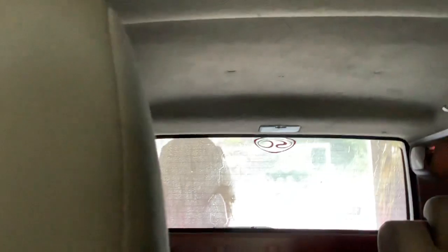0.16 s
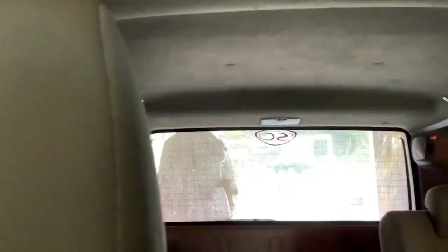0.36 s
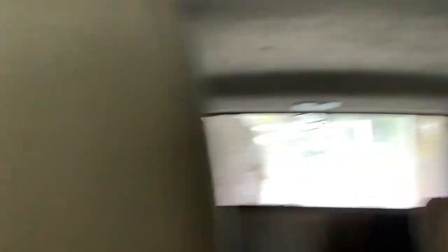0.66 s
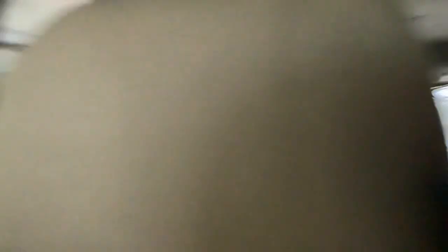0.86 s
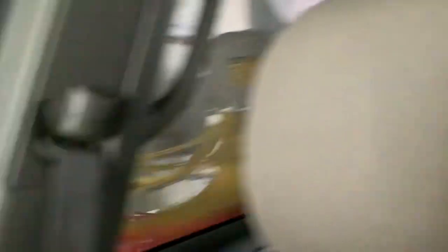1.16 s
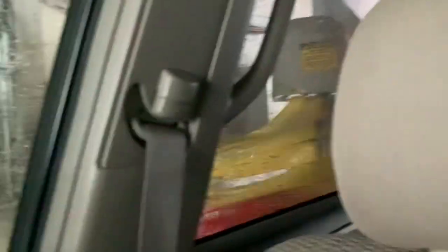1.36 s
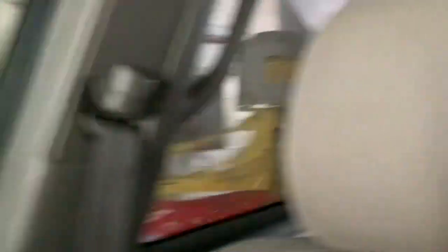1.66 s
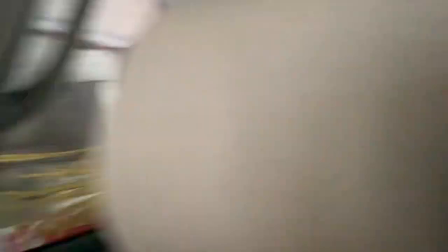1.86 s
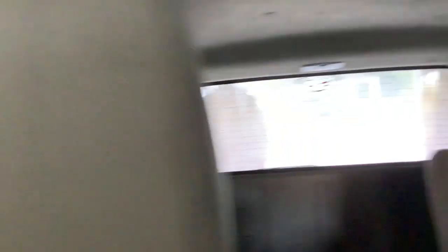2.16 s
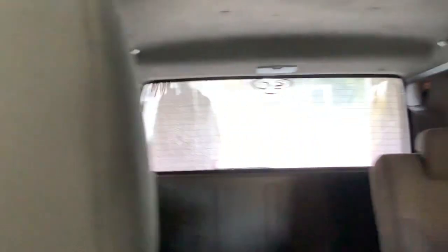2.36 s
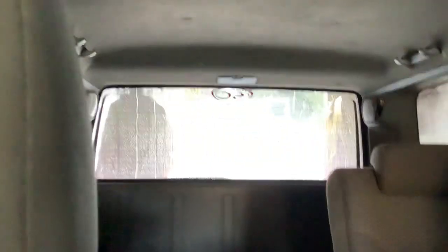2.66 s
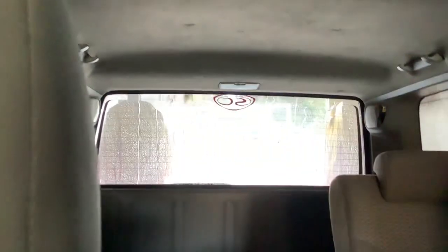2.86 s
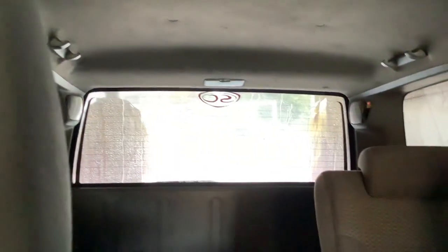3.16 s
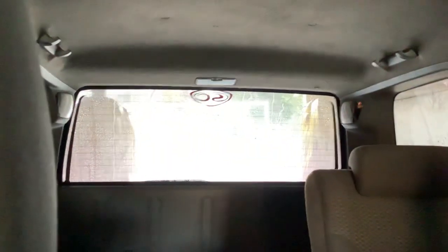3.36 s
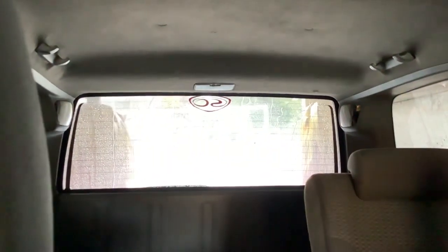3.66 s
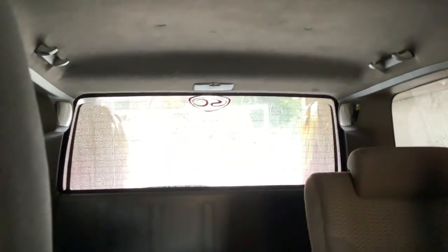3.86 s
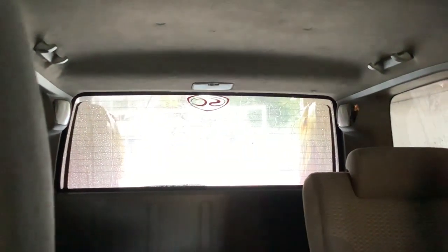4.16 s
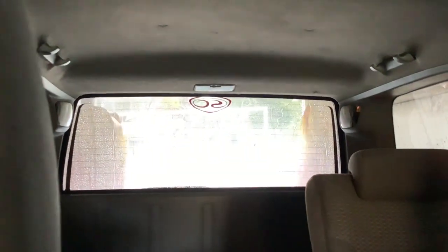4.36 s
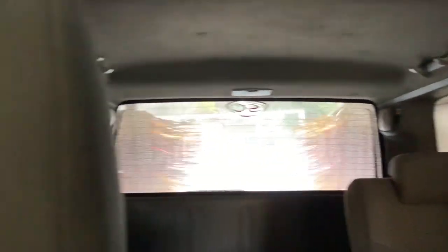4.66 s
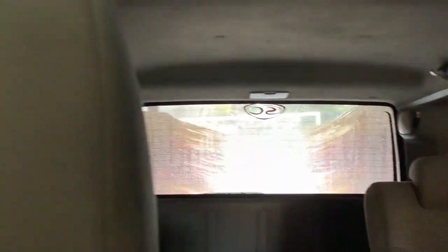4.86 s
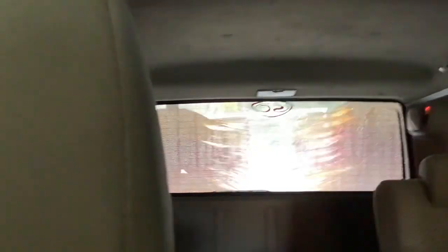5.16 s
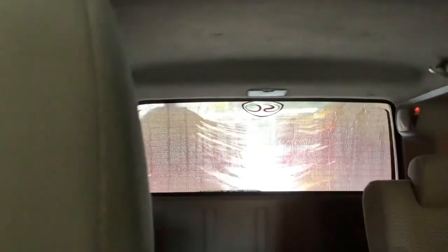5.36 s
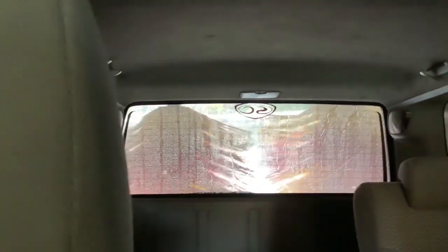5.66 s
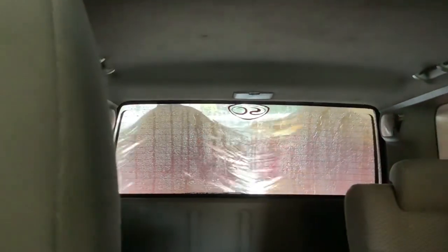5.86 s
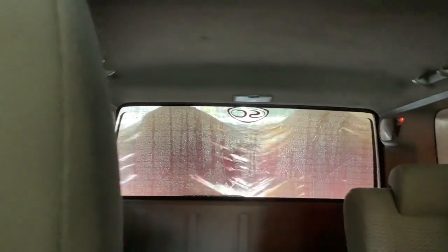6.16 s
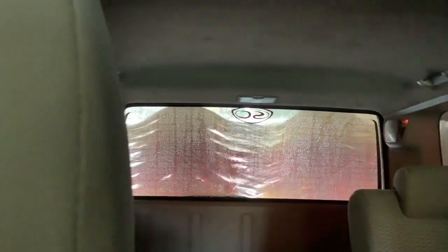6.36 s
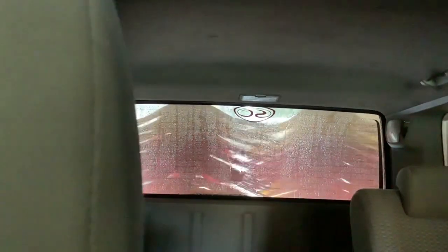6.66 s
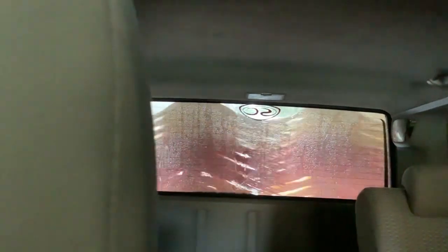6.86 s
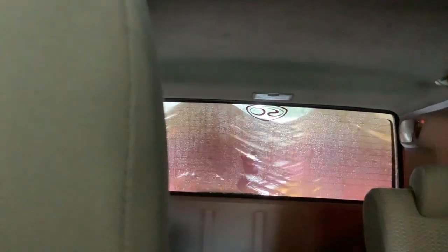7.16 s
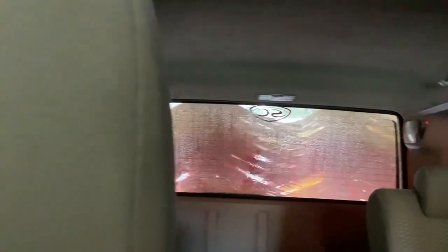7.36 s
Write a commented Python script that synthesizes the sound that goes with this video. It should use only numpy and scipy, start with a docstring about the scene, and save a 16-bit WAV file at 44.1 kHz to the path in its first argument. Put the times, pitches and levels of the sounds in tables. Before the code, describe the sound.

Wet cloth brushes scrub and spatter loudly along a car's side, heard from the cabin, then recede to faint muffled thumps behind the rear window.

```python
"""Wet cloth brushes scrub and spray along the side of a car in a wash bay, close to a microphone in the cabin;
then they move off and close in behind the tailgate. Scrub and spray are coloured contacts and noise.
Cloth patter and single blows ring cabin and panel modes; strips slap the glass as shaped noise bursts.
Short rubs, a dragged rear window, a wandering band of rushing water and a steady hiss lie underneath."""
import sys
import numpy as np
from scipy import signal
from scipy.fft import rfft, irfft, next_fast_len
from scipy.io import wavfile
from scipy.ndimage import uniform_filter1d

SR = 44100
rng = np.random.default_rng(int(sys.argv[2]) if len(sys.argv) > 2 else 0)


def materialize(psi):
    """Save the field psi as 16-bit PCM at rate SR to the path in sys.argv[1].

    A 1-D psi becomes a single channel; in a 2-D psi each row is a channel.
    """
    bounded = np.clip(np.atleast_2d(psi).T, -1, 1)
    quanta = np.round(bounded * 32767).astype(np.int16)
    wavfile.write(sys.argv[1], SR, quanta)


N = 330750


def gain_of(db):
    """Decibels to an amplitude factor."""
    return 10 ** (np.asarray(db) / 20)


def evened(x):
    """Scales to rms 1."""
    return x / np.sqrt(np.mean(x ** 2) + 1e-20)


def add(mix, start_s, sound):
    """Mixes a sound in at a time, cut at the end of the mix."""
    part = mix[round(start_s * SR):][:len(sound)]
    part += sound[:len(part)]


def control(curve, column):
    """One dB column of a curve as a gain for every sample."""
    rows = np.array(curve)
    return gain_of(np.interp(np.arange(N) / SR, rows[:, 0], rows[:, column]))


def flutter(per_s):
    """Slow noise of rms 1 that changes about per_s times a second."""
    f = np.fft.rfftfreq(N, 1 / SR) / per_s
    shape = f / (0.22 + f ** 2) / (1 + f ** 2)
    return evened(irfft(rfft(rng.standard_normal(N)) * shape, N))


def coloured(x, spectrum):
    """Filters x by a spectrum drawn on a log-frequency axis; rms 1."""
    hz, db = np.transpose(spectrum)
    f = np.fft.rfftfreq(len(x), 1 / SR)
    colour_db = np.interp(np.log(f + 1), np.log(hz), db, -90, -90)
    return evened(irfft(rfft(x) * gain_of(colour_db), len(x)))


def patter(per_s, spread_db):
    """Many small contacts at random moments and of random sign, a few of them large."""
    size = gain_of(spread_db * np.minimum(rng.exponential(1, N), 5))
    sign = np.sign(rng.standard_normal(N))
    return size * sign * (rng.random(N) < per_s / SR)


def patchy(x, depth_db):
    """Lets patches of the spectrum swell and fade at random; rms 1."""
    z = signal.stft(x, nperseg=1024, noverlap=768)[2]
    patches = uniform_filter1d(rng.standard_normal(z.shape), size=3, axis=0)
    patches = uniform_filter1d(patches, size=10, axis=1)
    z = z * gain_of(depth_db * evened(patches))
    return evened(signal.istft(z, nperseg=1024, noverlap=768)[1][:N])


def ring(hz, width_hz):
    """Answer of a resonance with steep skirts to one tap; energy 1."""
    t = np.arange(SR // 4) / SR
    wave = t * np.exp(-np.pi * 1.5 * width_hz * t) * np.sin(2 * np.pi * hz * t)
    return wave / np.linalg.norm(wave)


def already_sounding(hits, response):
    """Convolves hits with a quarter-second response that is already sounding at the start."""
    lead = SR // 4
    led_in = np.tile(hits, 2)[N - lead:]
    return signal.oaconvolve(led_in, response)[lead:][:N]


# brush work at the microphone: time_s, scrub_db, spray_db, cabin_air_db, roof_and_doors_db, small_panels_db
BRUSH = [(0, -24.5, -36.5, -32, -24.5, -27), (.3, -24, -36, -39, -27.5, -28),
         (.58, -26, -35.5, -38, -30.5, -26.5), (.9, -28.5, -38.5, -39, -27.5, -30),
         (1.42, -25.5, -35, -35, -33.5, -27.5), (1.55, -30, -40, -36, -32, -33),
         (1.9, -26.5, -36, -35.5, -33, -28), (2.15, -25, -38, -39, -26.5, -31),
         (2.35, -25.5, -38.5, -42, -30, -29.5), (2.55, -27, -39, -40, -30.5, -28),
         (2.8, -26.5, -40.5, -35, -30.5, -32), (2.86, -31, -43, -47, -31.5, -31),
         (2.95, -31, -45, -50, -33, -29), (3.05, -36.5, -48, -44, -41, -35.5),
         (3.18, -36.5, -47, -50, -40, -37), (3.3, -38, -54, -47, -35, -37.5),
         (3.47, -49, -56.5, -49, -51, -45.5), (3.58, -45, -56.5, -48, -42, -34.5),
         (3.72, -45.5, -56, -53, -33.5, -41.5), (3.9, -44, -56.5, -47, -40, -36.5),
         (4.1, -43.5, -56.5, -49, -39.5, -37.5), (4.35, -46, -62, -44, -43, -41.5),
         (4.55, -51, -66, -53, -47.5, -45.5), (4.85, -50, -62, -54, -45, -44),
         (5.15, -50, -61.5, -53, -43, -47), (5.7, -50.5, -66.5, -57, -48.5, -44),
         (6.1, -49.5, -66.5, -55, -44, -45), (6.5, -50.5, -66.5, -51, -49, -46),
         (6.75, -48.5, -63.5, -66, -41, -44), (7.0, -51.5, -61.5, -55, -43, -45),
         (7.5, -48.5, -54.5, -51, -44, -46.5)]
# nearness of the cloth contact: time_s, near_share (0-1)
NEAR = [(0, 1), (.5, 0.66), (1.2, 0.98), (2.6, 0.65), (3.1, 0.98), (3.3, 0.47), (3.5, 0.67), (4.0, 0.38),
        (4.6, 0.24), (5.8, 0.22), (6.6, 0.32), (7.0, 0.54), (7.5, 0.67)]
# cloth on paint, beside the microphone and from behind the car: freq_hz, relative_db (per Hz)
SCRUB_NEAR = [(220, -22), (340, 0), (480, 2), (540, -4.5), (640, -1), (700, -3), (765, 0.5), (830, -5.5),
              (1000, -4.5), (1100, -3.5), (1250, -5), (1370, -10), (1500, -6.5), (1630, -9), (1730, -9),
              (1800, -11), (2400, -18.5), (4000, -32.5)]
SCRUB_FAR = [(220, -42), (350, 5.5), (480, -2.5), (570, -2), (640, -4.5), (690, -11), (745, -9),
             (920, -13.5), (1050, -14), (1210, -20), (1300, -16.5), (1700, -27), (2150, -23), (2600, -34),
             (4000, -40)]
# water spray, near and far: freq_hz, relative_db (per Hz)
SPRAY_NEAR = [(1200, -19), (2200, 0.5), (3500, -3), (5500, -4), (8000, -7), (12000, -9.5), (16000, -13)]
SPRAY_FAR = [(1500, -24), (2600, -5), (3300, -1.5), (4400, 0), (6000, -8), (8000, -3), (12000, -14.5),
             (16000, -9)]
# spray smooths out as it moves off: from_s, to_s
SPRAY_LEAVES_S = [1.1, 3.1]
DROPS_DB = -6  # re spray, before it smooths out
PRESS_SCRUB, PRESS_SPRAY = 0.16, 0.091  # amplitude share added by a landing strip
LULL_SPRAY = 1  # share of the lull depth in dB


def scrub_and_spray():
    """Cloth drags over paint and throws water; both swell as bunches of strips pass, less so from afar."""
    t = np.arange(N) / SR
    near = np.interp(t, *np.transpose(NEAR))
    far = 1 - near
    uneven = 0.84 + 0.29 * near
    bunches = uneven * flutter(27.0)

    contacts = patter(per_s=6000, spread_db=1.5)
    scrub_far = evened(coloured(contacts, SCRUB_FAR) * flapping())
    scrub = patchy(near * coloured(contacts, SCRUB_NEAR) + far * scrub_far, depth_db=1.8)
    scrub *= gain_of(0.55 * near * bunches + 1.3 * far * flutter(12.0))

    water = rng.standard_normal(N)
    spray = near * coloured(water, SPRAY_NEAR) + far * coloured(water, SPRAY_FAR)
    spray = patchy(spray, depth_db=2.0)
    roughness = 0.5 + 0.5 * np.interp(t, SPRAY_LEAVES_S, [1, 0])
    spray *= gain_of(roughness * (2.0 * bunches + 0.87 * uneven * flutter(52.0)))
    spray = evened(spray) + gain_of(DROPS_DB) * roughness * droplets()

    pressed, dip_db = pressing(), lulls_db()
    scrub = evened(scrub) * (1 + PRESS_SCRUB * pressed) * gain_of(dip_db)
    spray = evened(spray) * (1 + PRESS_SPRAY * pressed) * gain_of(LULL_SPRAY * dip_db)
    return control(BRUSH, column=1) * scrub + control(BRUSH, column=2) * spray


FLAPS_PER_S, FLAP_RISE_S, FLAP_T60_S, FLAP_SHARE = 60, 0.014, 0.18, 0.1


def flapping():
    """Loose strips flap on the tailgate: uneven pushes at random moments, each dying away."""
    t = np.arange(SR // 4) / SR
    push = np.minimum(t / FLAP_RISE_S, 1) * gain_of(-60 * t / FLAP_T60_S)
    hits = abs(patter(per_s=FLAPS_PER_S, spread_db=4.5))
    return 1 + FLAP_SHARE * evened(already_sounding(hits, push))


DROPS_PER_S, DROP_RISE_S, DROP_T60_S = 400, 0.00051, 0.027


def droplets():
    """Single splashes of 16 colours scattered at random: band noise with a fast rise and decay."""
    out, t = np.zeros(N), np.arange(1024) / SR
    octave = np.log2(np.fft.rfftfreq(len(t), 1 / SR) / 1000 + .01)  # re 1 kHz
    shape = np.minimum(t / DROP_RISE_S, 1) * gain_of(-60 * t / DROP_T60_S)
    train = patter(per_s=DROPS_PER_S, spread_db=3.5)
    kind = rng.integers(0, 16, N)
    for k, centre_oct in enumerate(np.linspace(1.0, 3.7, 16)):
        noise = rng.standard_normal(len(t))
        band = irfft(rfft(noise) * gain_of(-14.0 * (octave - centre_oct) ** 2))
        out += signal.oaconvolve(train * (kind == k), evened(band) * shape)[:N]
    return evened(out)


PRESS_T60_S = 0.039


def pressing():
    """Each landing strip presses the cloth: a rise as in its slap, then a quick release."""
    out, t = np.zeros(N), np.arange(SR // 4) / SR
    for start_s, _, rise_s, *_ in SLAPS:
        release = gain_of(-60 * np.maximum(t - rise_s, 0) / PRESS_T60_S)
        add(out, start_s, np.minimum(t / rise_s, 1) * release)
    return out


# lulls between bunches of strips: centre_s, depth_db
LULLS = [(.25, -6), (.33, -3), (0.729, -5), (.907, -1.5), (1.037, -4), (1.117, -0.5), (1.18, -1),
         (1.27, -2.5), (1.48, -4), (1.71, -1.5), (1.769, -2), (1.983, -6.5), (2.13, -6.5), (2.435, -1),
         (2.69, -3), (2.825, -6), (2.905, -2.5), (3.01, -1.5), (3.14, -2), (3.865, -5.5), (4.26, -1),
         (6.185, -0.5), (7.04, -1)]
LULL_HALF_WIDTH_S = 0.017  # to 1/e of the depth


def lulls_db():
    """Dips in cloth contact as a dB curve of bell shapes."""
    t = np.arange(N) / SR
    return sum(depth_db * np.exp(-((t - centre_s) / LULL_HALF_WIDTH_S) ** 2) for centre_s, depth_db in LULLS)


# cabin and panel resonances: freq_hz, width_hz, relative_db
CABIN = [(51.5, 19, -3), (93, 18, 6.5), (116.4, 30.4, -3), (177.2, 23.5, 4), (207.4, 20, 5),
         (240.2, 47.4, 4.5), (270, 44, 3), (349.7, 19.4, -11.5), (400, 24, -21), (477, 45, -21),
         (554, 36, -13), (630, 66, -49), (735, 66, -31)]
# upper limits of cabin air, roof and doors; small panels lie above: top_hz
PART_TOPS_HZ = [70, 105, 132]
PART_WANDER_DB, PART_WANDER_PER_S = 0.7, 1.13
ROOF_DB = -3.5  # re doors
LULL_BODY = 0.34  # share of the lull depth in dB


def drumming():
    """The patter of cloth strips shakes each resonance on its own, in uneven lumps."""
    parts, lumps = np.zeros((4, N)), flutter(6.7)
    for hz, width_hz, db in CABIN:
        blows = evened(patter(per_s=500, spread_db=2.0) * gain_of(0.11 * lumps))
        rung = already_sounding(blows, ring(hz, width_hz))
        parts[np.searchsorted(PART_TOPS_HZ, hz)] += gain_of(db) * rung
    air, roof, doors, panels = [
        evened(part * gain_of(PART_WANDER_DB * flutter(PART_WANDER_PER_S))) for part in parts]
    sides = evened(gain_of(ROOF_DB) * roof + doors)
    body = control(BRUSH, column=4) * sides + control(BRUSH, column=5) * panels
    return control(BRUSH, column=3) * air + body * gain_of(LULL_BODY * lulls_db())


# wet strips whipping or wiping the glass: start_s, level_db, rise_s, t60_s, centre_oct (re 1 kHz)
SLAPS = [(0.029, -29.5, 0.0091, 0.67, 2.7), (0.118, -28, 0.0048, .12, 3.5), (0.158, -29, 0.019, 0.15, 2.2),
         (.174, -33.5, 0.04, 0.11, 2.2), (.233, -33, 0.014, 0.26, 2.8), (.262, -31, .025, 0.18, 2.5),
         (0.346, -23, 0.0053, 0.072, 3.1), (.374, -32, 0.0046, .12, 4.8), (.415, -29.5, 0.02, 0.28, 3.1),
         (.488, -28, 0.0083, 0.16, 2.5), (.545, -27, 0.011, 0.22, 2.7), (0.614, -30, 0.0043, .085, 4.1),
         (0.658, -29, 0.011, 0.05, 2.5), (.713, -33.5, 0.016, 0.049, 2.7), (.777, -34.5, 0.0095, 0.97, 2.6),
         (0.857, -18, 0.0045, 0.061, 3.4), (0.873, -30.5, 0.0089, 0.1, 1.9), (.912, -46, .004, .08, 3.1),
         (1.002, -32, 0.0055, 0.12, 2.3), (1.069, -32, 0.015, 0.12, 2.6), (1.125, -29, 0.015, 0.2, 2.9),
         (1.215, -27, 0.0097, 0.19, 2.8), (1.278, -26, 0.0083, 0.15, 2.25), (1.334, -32, 0.017, 0.15, 4.1),
         (1.402, -24.5, 0.0073, 0.097, 3.1), (1.417, -30, 0.038, 0.043, 5.2),
         (1.491, -34, 0.018, 0.12, 2.8), (1.593, -38, 0.0074, 0.17, 4.2), (1.63, -31.5, 0.033, 0.062, 2.6),
         (1.75, -31.5, 0.0044, .1, 3.1), (1.823, -30.5, 0.0097, 0.079, 2.8), (1.887, -33, 0.0097, .13, 2.1),
         (1.937, -26.5, .004, 0.04, 4.5), (2.0, -28.5, 0.0032, 0.1, 3.7), (2.07, -30.5, 0.023, 0.097, 2.6),
         (2.141, -36.5, 0.0086, 0.11, 2.5), (2.196, -33.5, 0.012, 0.1, 2.7),
         (2.301, -24.5, 0.0032, 0.057, 2.1), (2.347, -31, .006, 0.15, 2.3),
         (2.393, -30.5, 0.0033, 0.12, 2.3), (2.453, -24, 0.0084, 0.05, 2.4),
         (2.493, -34, 0.0057, 0.11, 2.6), (2.374, -39, 0.0037, .06, 2.6), (2.255, -34, .004, .1, 3.5),
         (2.18, -41, .006, .08, 3.7), (1.044, -37, .005, 0.087, 2.5), (1.563, -46, .005, 0.083, 3.4),
         (1.698, -44, .005, .08, 3), (0.82, -35, .008, 0.11, 3.5), (0.945, -41, 0.0067, .12, 3.6),
         (1.236, -27.5, 0.016, .12, 2.1), (2.521, -26.5, 0.0037, 0.061, 3.1),
         (2.568, -31.5, 0.0089, 0.042, 2.3), (2.599, -36, 0.0067, 0.13, 1.3), (2.625, -35, 0.013, 0.2, 3.1),
         (2.693, -21, 0.0022, 0.069, 3.9), (2.728, -33.5, .008, 0.065, 3.4), (2.763, -35, 0.019, 0.077, 2),
         (2.859, -31, 0.019, 0.07, 2.7), (2.927, -33, 0.0046, 0.23, 3.2), (2.965, -35, 0.0046, 0.12, 1.7),
         (3.019, -33.5, 0.0051, 0.084, 1.9), (3.062, -41.5, 0.0061, 0.088, 1.8),
         (3.095, -41, 0.0091, 0.071, 1.1), (3.165, -40, 0.0088, 0.11, 3.5), (3.25, -45.5, .006, 0.11, 2.2)]


def slaps():
    """Each strip lands as a burst of wet spatter with its own uneven colour, then drains."""
    out, t = np.zeros(N), np.arange(8192) / SR
    octave = np.log2(np.fft.rfftfreq(len(t), 1 / SR) / 1000 + .01)  # re 1 kHz
    skirts_db = -1.8 * np.maximum(octave - 3.3, 0) - 8.1 * np.maximum(1.2 - octave, 0)
    for start_s, level_db, rise_s, t60_s, centre_oct in SLAPS:
        noise, bumps, drops = rng.standard_normal((3, len(t)))
        uneven_db = 2.8 * evened(uniform_filter1d(bumps, size=140))[:len(octave)]
        colour_db = uneven_db - 2.0 * (octave - centre_oct) ** 2 + skirts_db
        burst = evened(irfft(rfft(noise) * gain_of(colour_db)))
        spatter = evened(gain_of(2.6 * evened(uniform_filter1d(drops, size=50))))
        shape = np.minimum(t / rise_s, 1) * gain_of(-60 * np.maximum(t - rise_s, 0) / t60_s)
        add(out, start_s, gain_of(level_db) * shape * spatter * burst)
    return out


# heavier cloth blows on the panels: start_s, peak_db, centre_oct (re 100 Hz), damping (relative)
THUDS = [(0.479, -28, 4, 0.63), (0.556, -13.5, 1.1, 1.7), (2.147, -20, -6, 2.6), (2.519, -19, 4, 0.57),
         (2.735, -36, 0, 0.78), (2.778, -25, 2, 3.1), (3.166, -26, 3, 1.5), (3.528, -41, 2.5, 0.56),
         (3.578, -30, 0.5, 0.73), (3.659, -27, 1.8, 1.2), (3.72, -30.5, 2.2, 0.81), (3.754, -34, 2.5, 1.4),
         (3.815, -32, 2, 0.52), (3.85, -28, 1.6, 1.1), (3.945, -30, 2.5, 1.4), (4.003, -23, 0.83, 0.53),
         (4.131, -34.5, 2.1, 0.89), (4.183, -32, 3, 1.1), (4.209, -31.5, 2.4, 1.1), (4.30, -38, 3, 0.37),
         (4.76, -36, 2.5, 0.63), (4.869, -42, 2.8, 1.1), (4.907, -26, 2, 2.3), (4.99, -28, 1.5, 2),
         (5.091, -32, 1.5, 1.3), (5.146, -23, 0.95, 1), (5.258, -31, 2.5, 2.7), (5.43, -36, 2, 0.82),
         (5.604, -38.5, 2.5, 1.2), (5.744, -37, 1.5, 1), (5.864, -34, 1, 0.85), (5.964, -38, 2, 0.71),
         (6.134, -30, 2.3, 1.3), (6.152, -46, -3, 1.3), (6.232, -39, 1.2, 1), (6.277, -28, 2.1, 1.2),
         (6.303, -25, 1.5, 2.7), (6.427, -33.5, 2.5, 1.9), (6.529, -31, 0.5, 0.38), (6.601, -25, 2.1, 2.3),
         (6.619, -28.5, 1.8, 1.15), (6.667, -34, 2, 1.8), (6.809, -34, 2.5, 1.2), (6.826, -32, 1, 2.2),
         (6.875, -33, 0, 1.2), (7.091, -41, 2.5, 0.64), (7.298, -24, 2, 3.1)]
BLOW_PLACE_DB, BLOW_DETUNE_SHARE = 2, 0.04  # each blow lands elsewhere: rms spread of the modes
BLOW_TILT_DB_PER_OCT = -10  # a soft blow wakes high modes less


def thuds():
    """One blow rings the resonances around its centre; a damped blow is shorter and wakes a wider range."""
    out, t = np.zeros(N), np.arange(SR // 4)[:, None] / SR
    hz, width_hz, _ = np.transpose(CABIN)
    octave = np.log2(hz / 100)
    for start_s, peak_db, centre_oct, damping in THUDS:
        place, detune = rng.standard_normal((2, len(hz)))
        reach_db = -14.0 / damping * (octave - centre_oct) ** 2
        woken = gain_of(BLOW_PLACE_DB * place + BLOW_TILT_DB_PER_OCT * octave + reach_db)
        decay = np.exp(-np.pi * 0.9 * damping * width_hz * t)
        modes = np.sin(2 * np.pi * hz * (1 + BLOW_DETUNE_SHARE * detune) * t)
        blow = (woken * decay * modes).sum(axis=1)
        blow *= np.sin(np.pi / 2 * np.minimum(t[:, 0] * damping / 0.0054, 1)) ** 2  # soft onset
        add(out, start_s, gain_of(peak_db) * blow / abs(blow).max())
    return out


# short rubs and taps on trim and rear glass: start_s, level_db, centre_hz, width_hz, t60_s
TICKS = [(2.147, -29, 900, 900, .12), (3.165, -35, 900, 900, .1), (3.31, -43, 1200, 900, .08),
         (3.426, -54, 900, 900, .08), (3.723, -48, 800, 700, 0.07), (3.753, -47, 1000, 1000, 0.071),
         (3.814, -41, 800, 700, .08), (4.268, -57, 1300, 1000, .1), (4.343, -48, 800, 600, 0.091),
         (4.45, -54, 1200, 900, .1), (4.752, -65, 1300, 900, .1), (4.87, -57, 1600, 1200, .12),
         (5.09, -51, 1300, 1200, 0.13), (5.358, -54, 1700, 1400, .12), (5.735, -56, 1700, 1200, 0.11),
         (5.925, -51, 1100, 900, .1), (6.012, -57, 1900, 700, .1), (6.6, -52, 900, 700, .1),
         (6.817, -49, 1300, 900, .1), (6.128, -61, 1550, 400, .07), (6.192, -55, 1800, 500, .07),
         (6.353, -52.5, 2010, 150, 0.11), (6.43, -60, 2170, 600, .12), (6.575, -59, 4200, 1000, 0.18),
         (6.59, -58, 2100, 700, .12), (6.704, -59, 2170, 450, 0.17), (6.778, -53, 4720, 2000, 0.13),
         (6.777, -55, 7500, 3000, .06), (6.777, -58, 3320, 500, 0.09), (6.776, -53, 2150, 350, 0.076),
         (6.825, -58, 3200, 900, .09)]
TICK_GRIT_DB, TICK_RISE_S = 3.5, 0.003


def ticks():
    """Brief scratchy rubs: decaying noise, each strongest in its own band."""
    out, t = np.zeros(N), np.arange(4096) / SR
    f = np.fft.rfftfreq(len(t), 1 / SR)
    for start_s, level_db, centre_hz, width_hz, t60_s in TICKS:
        noise, grit = rng.standard_normal((2, len(t)))
        band = irfft(rfft(noise) / (1 + (2 * (f - centre_hz) / width_hz) ** 2))
        puff = evened(band * gain_of(TICK_GRIT_DB * evened(uniform_filter1d(grit, size=90))))
        shape = np.minimum(t / TICK_RISE_S, 1) * gain_of(level_db - 60 * t / t60_s)
        add(out, start_s, shape * puff)
    return out


# cloth dragging on the rear glass: time_s, level_db
GLASS_RUB = [(4.5, -78), (5.4, -72), (6.2, -72), (6.75, -71), (7.1, -65), (7.5, -62)]
GLASS_HZ, GLASS_WIDTH_HZ = 2090, 330


def rear_glass():
    """Uneven small contacts ring one broad resonance of the rear window."""
    rubbing = patter(per_s=900, spread_db=2.0) * gain_of(3.1 * flutter(14.0))
    rung = signal.oaconvolve(rubbing, ring(GLASS_HZ, GLASS_WIDTH_HZ))[:N]
    return control(GLASS_RUB, column=1) * evened(rung)


# water rushing behind the car: time_s, level_db, centre_hz
RUSH = [(4.6, -87, 3710), (4.8, -80, 3760), (4.86, -64, 3720), (5.06, -66, 3930), (5.2, -79, 3850),
        (5.35, -82, 3760), (5.5, -87, 3740), (6.9, -78, 4400), (7.2, -68, 4430), (7.4, -58, 4380),
        (7.5, -60, 4500)]
RUSH_HALF_WIDTH_HZ = 850.0


def water_behind():
    """Low-passed noise pair shifted up to a wandering centre, with a grainy level."""
    time_s, _, centre_hz = np.transpose(RUSH)
    low_pass = signal.butter(2, RUSH_HALF_WIDTH_HZ, fs=SR, output="sos")
    band = signal.sosfilt(low_pass, rng.standard_normal((2, N)))
    phase = 2 * np.pi * np.cumsum(np.interp(np.arange(N) / SR, time_s, centre_hz)) / SR
    shifted = band[0] * np.cos(phase) + band[1] * np.sin(phase)
    return control(RUSH, column=1) * evened(gain_of(2.2 * flutter(70.0)) * shifted)


# steady hiss of the bay and microphone: freq_hz, relative_db (per Hz)
HISS = [(2000, -11), (6000, -12), (10000, -9.5), (16000, -8)]
HISS_DB = -69.5


def hiss():
    """Steady coloured noise."""
    return gain_of(HISS_DB) * coloured(rng.standard_normal(N), HISS)


def scene():
    """All sources as one microphone hears them."""
    brushes = scrub_and_spray() + drumming()
    strikes = slaps() + thuds() + ticks()
    background = rear_glass() + water_behind() + hiss()
    return (brushes + strikes + background)[None]


LOW_CUT_HZ, BAND_EDGE_HZ = 36.0, 15760


def record(dry):
    """The microphone steps down above 6 kHz, fades at the top and drops deep bass; then the band limit."""
    size = next_fast_len(N + SR // 4)
    f = np.fft.rfftfreq(size, 1 / SR)
    step_db = -6.0 * np.clip((f - 6100) / 150, 0, 1)
    fade_db = -7.5 * np.clip((f - 11500) / 4000, 0, 1)
    toned = irfft(rfft(dry, size) * gain_of(step_db + fade_db), size)[:, :N]
    thin = signal.sosfilt(signal.butter(4, LOW_CUT_HZ, "high", fs=SR, output="sos"), toned)
    band_limit = signal.firwin(2047, BAND_EDGE_HZ, window=("kaiser", 9), fs=SR)
    return signal.oaconvolve(thin, band_limit[None], "same")


dry = scene()
out = record(dry)
materialize(out)
```